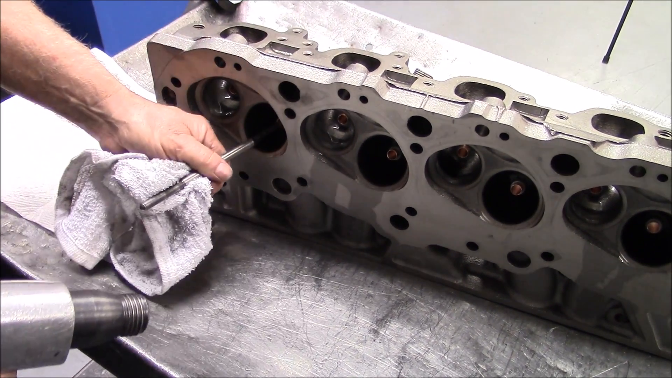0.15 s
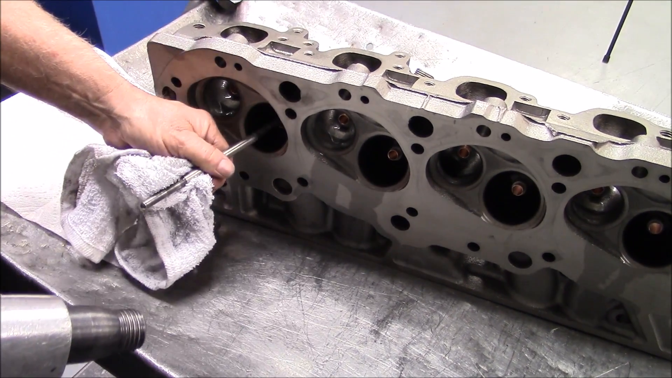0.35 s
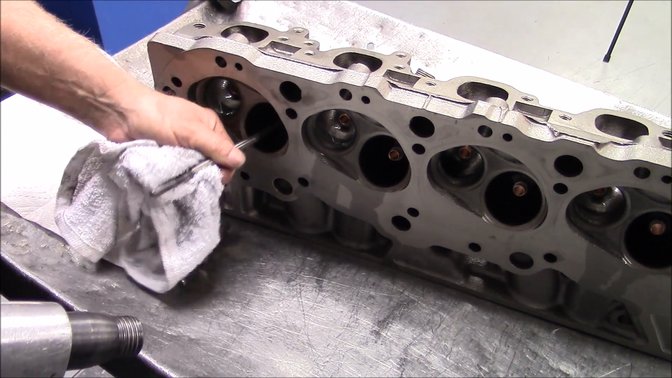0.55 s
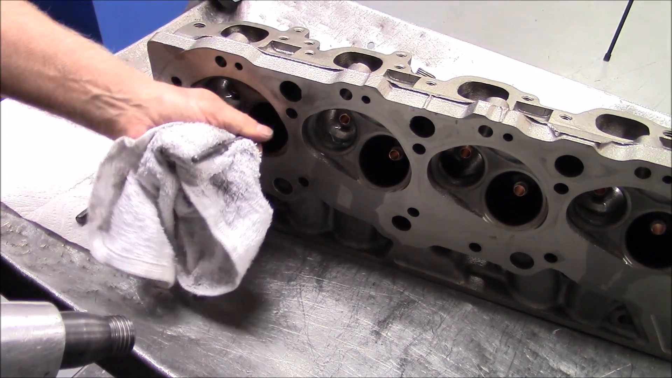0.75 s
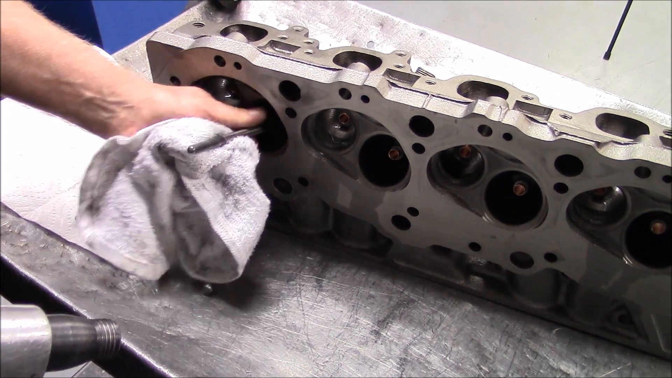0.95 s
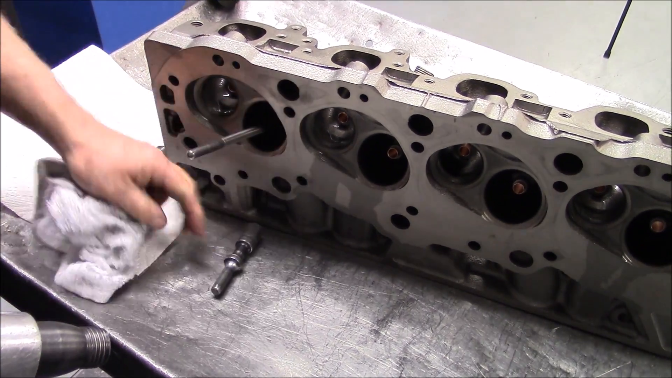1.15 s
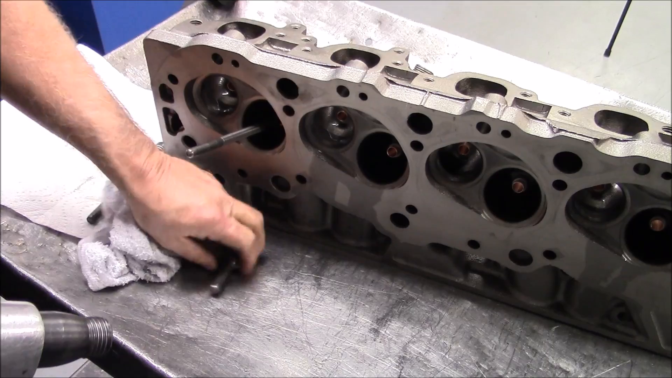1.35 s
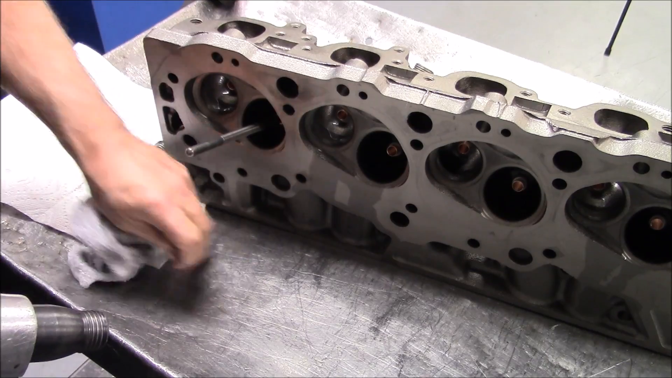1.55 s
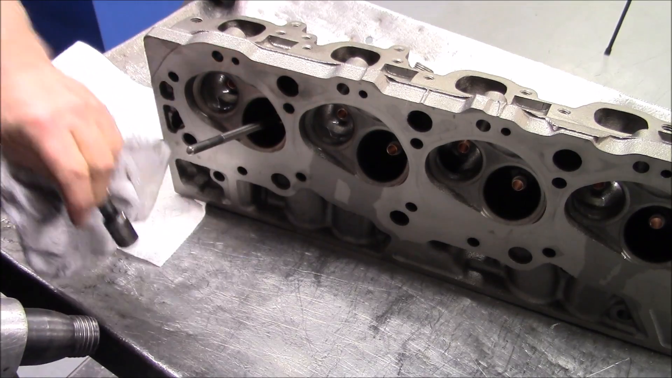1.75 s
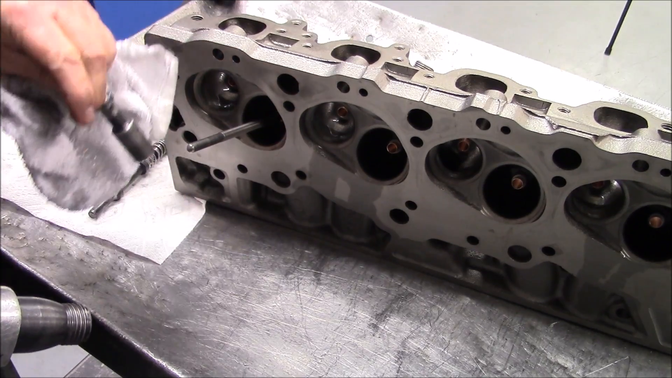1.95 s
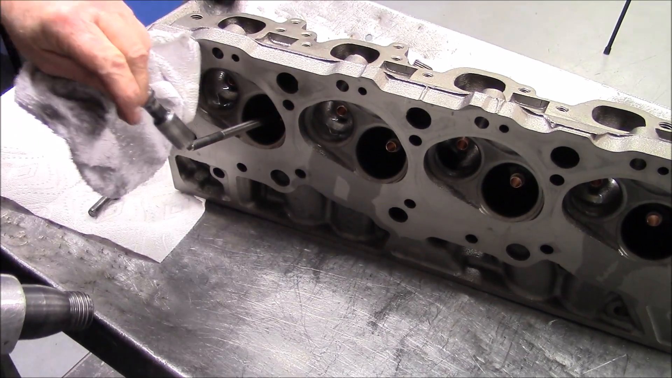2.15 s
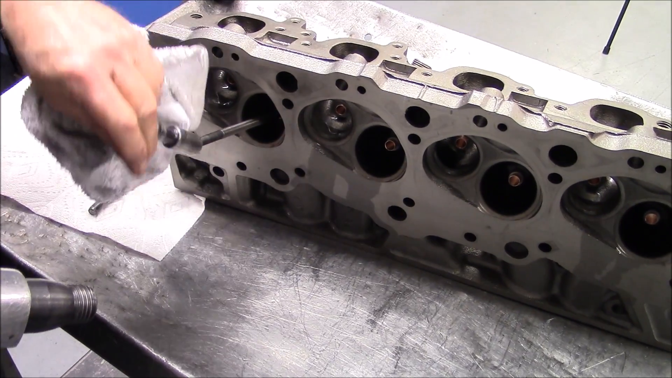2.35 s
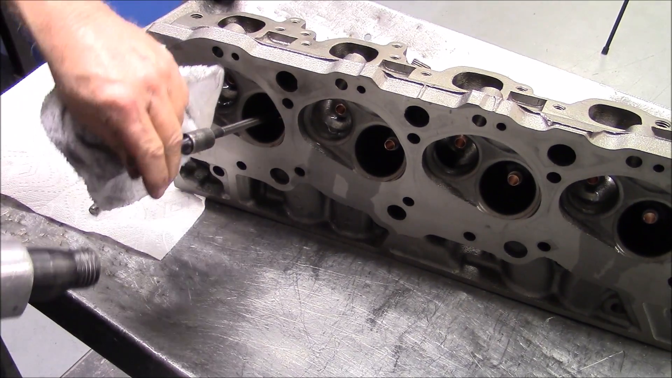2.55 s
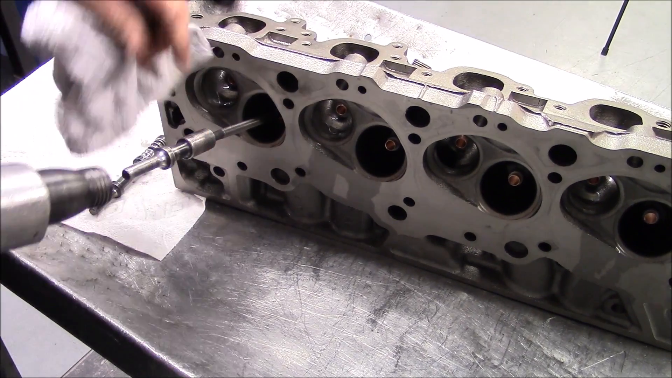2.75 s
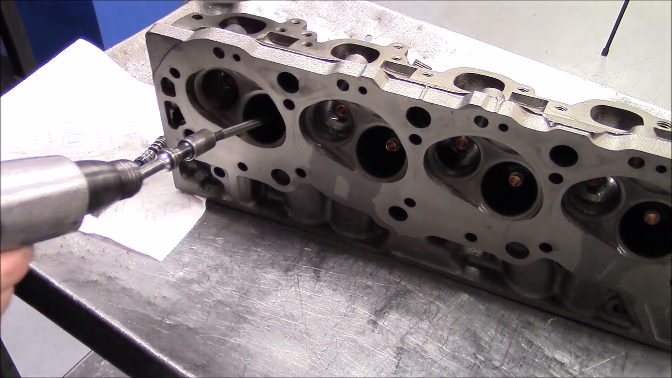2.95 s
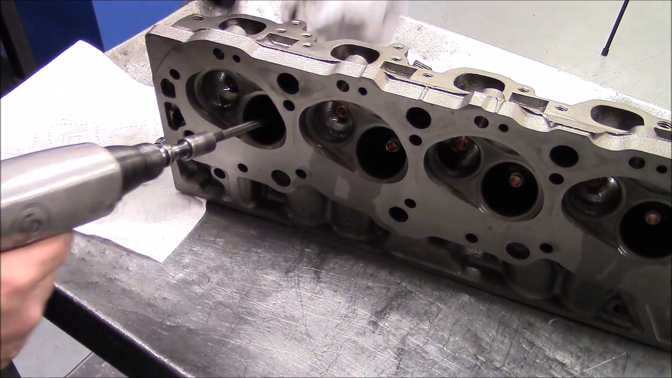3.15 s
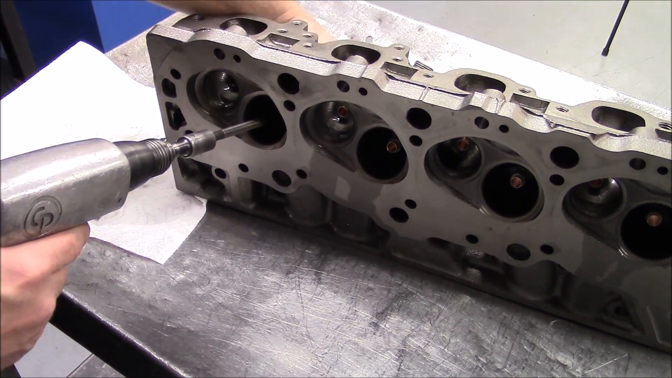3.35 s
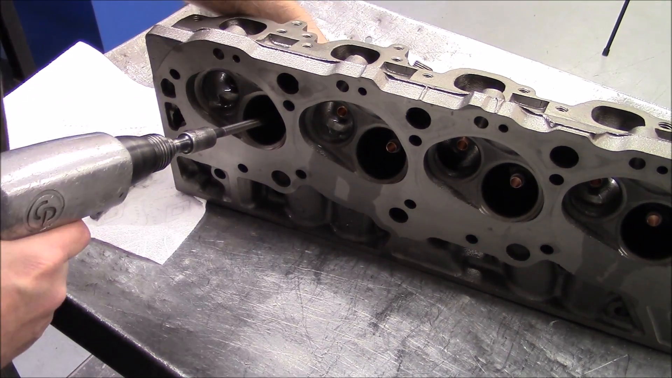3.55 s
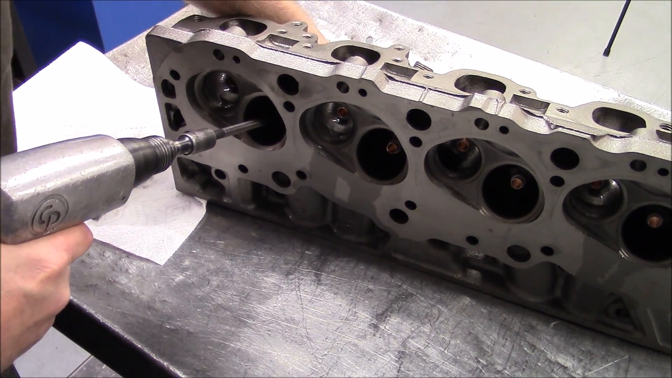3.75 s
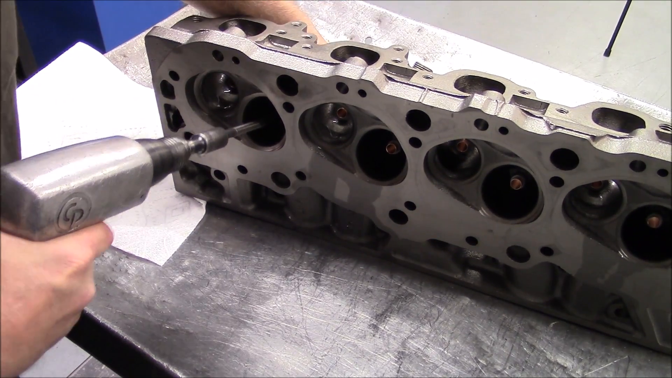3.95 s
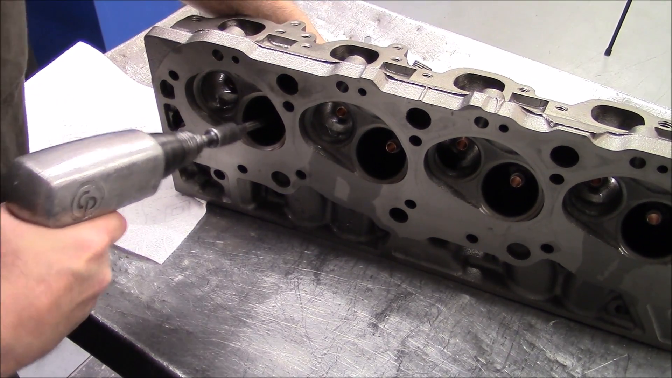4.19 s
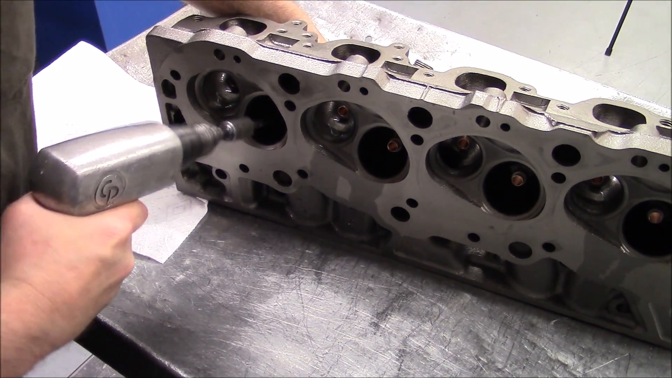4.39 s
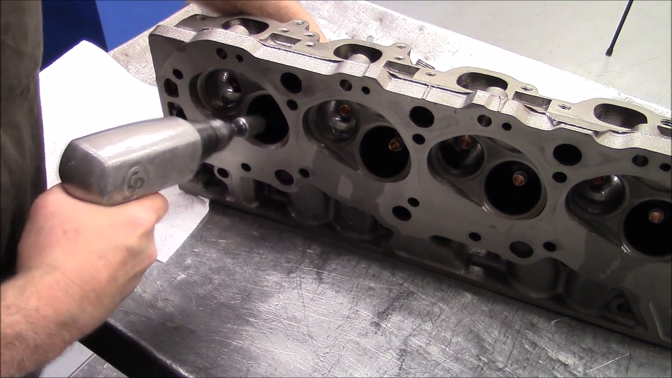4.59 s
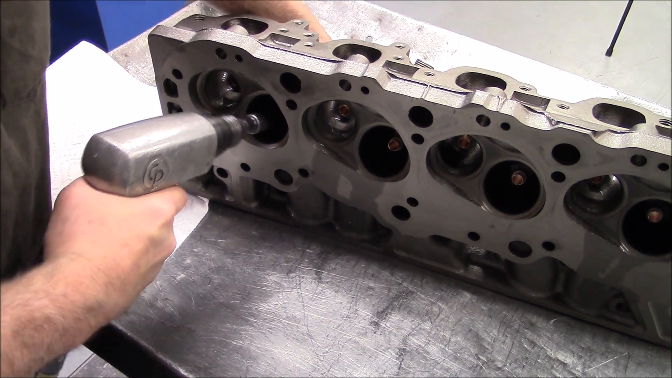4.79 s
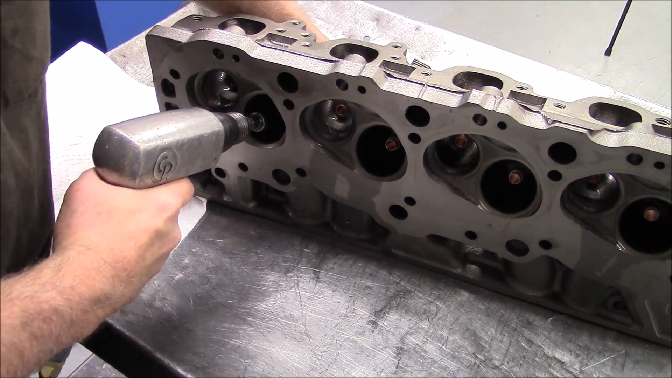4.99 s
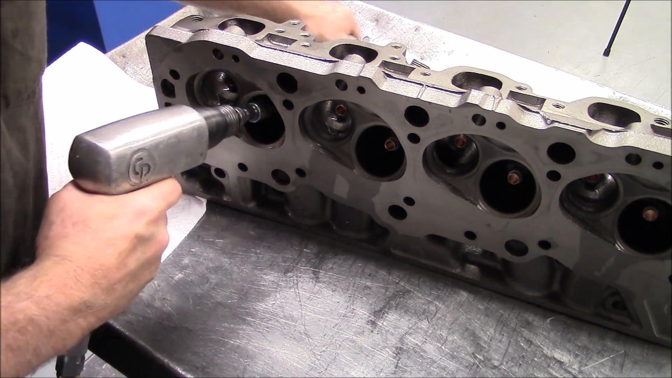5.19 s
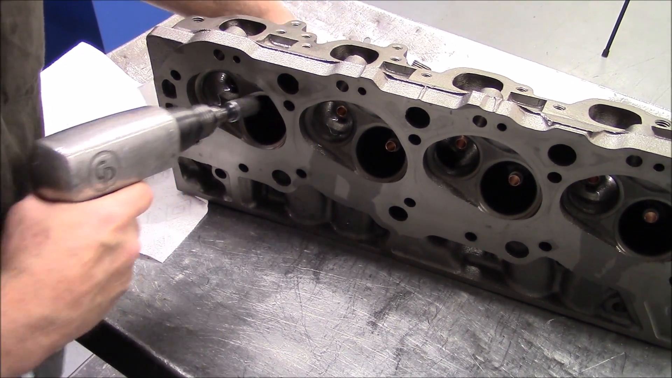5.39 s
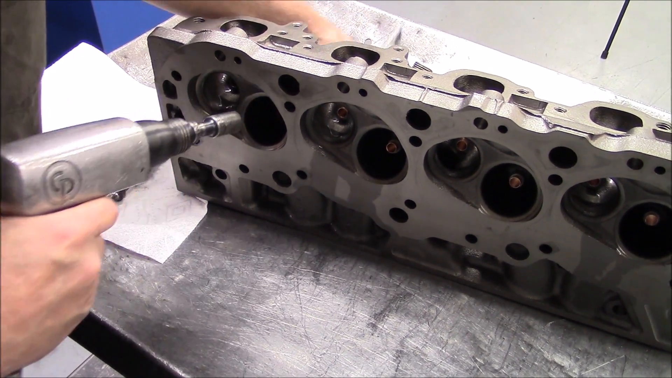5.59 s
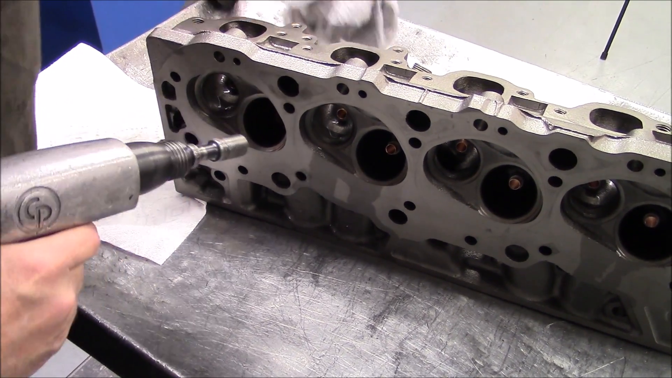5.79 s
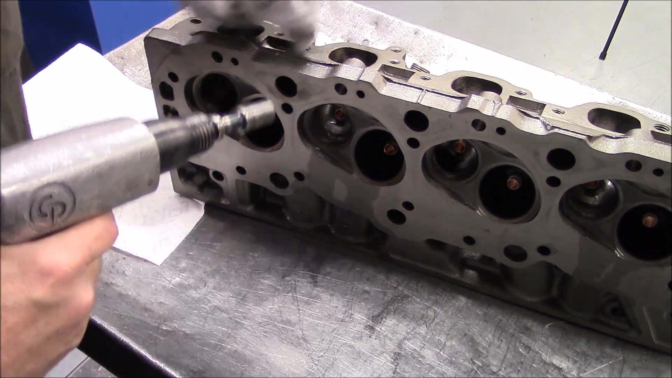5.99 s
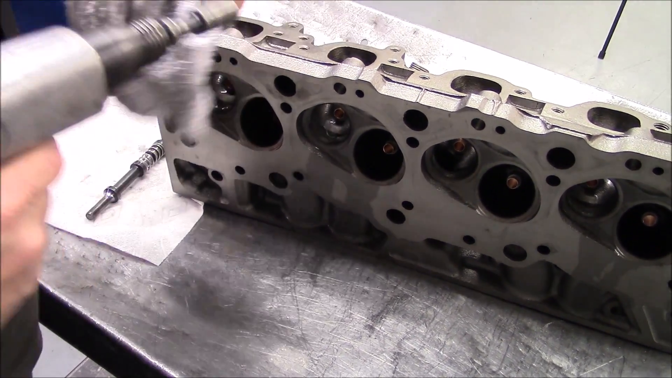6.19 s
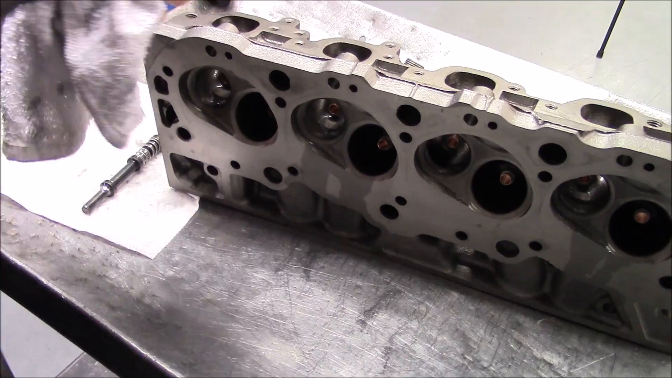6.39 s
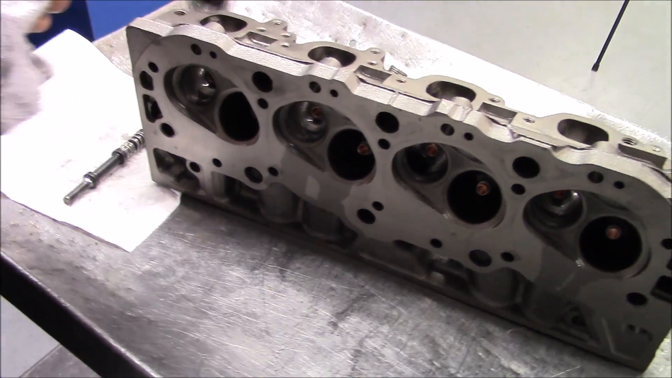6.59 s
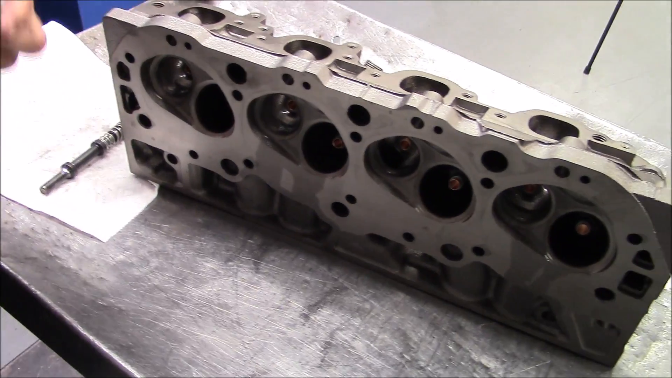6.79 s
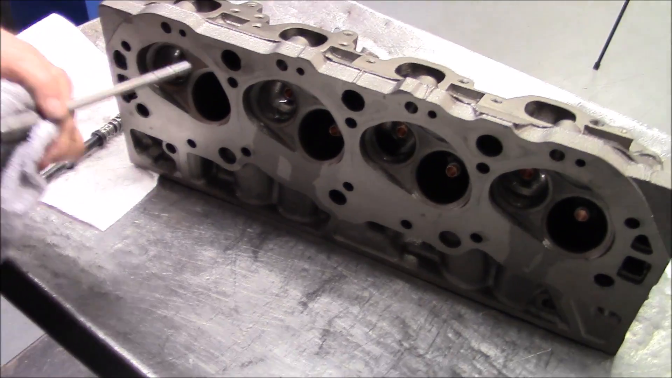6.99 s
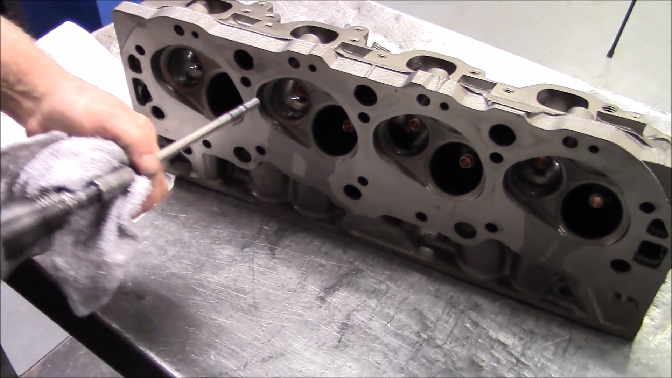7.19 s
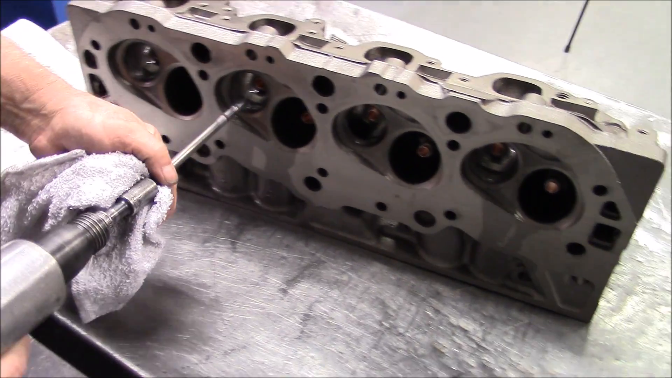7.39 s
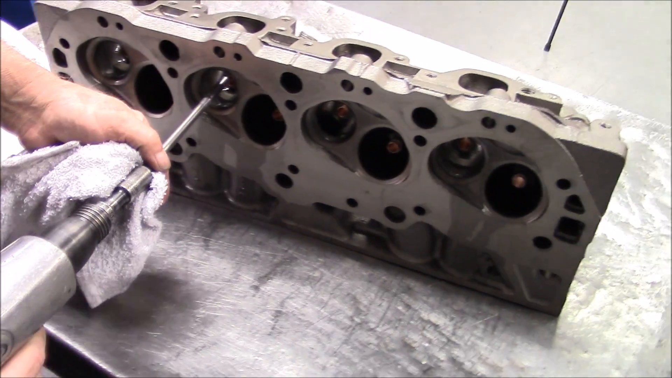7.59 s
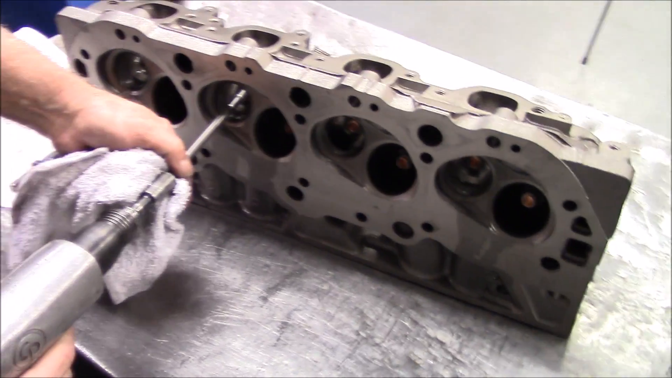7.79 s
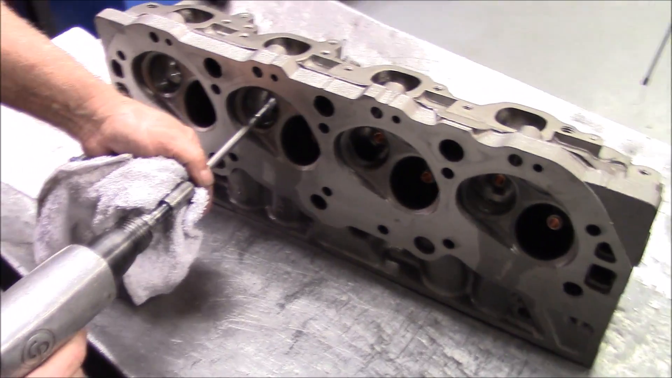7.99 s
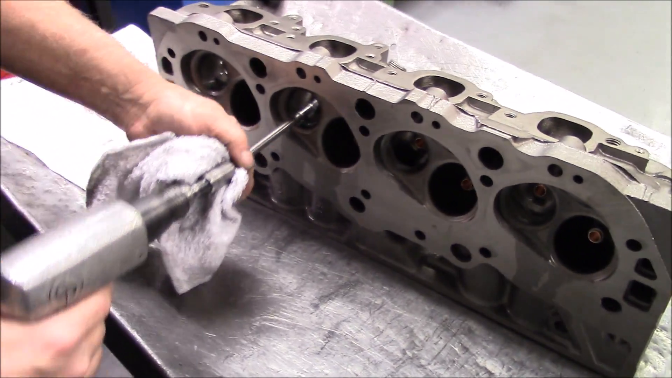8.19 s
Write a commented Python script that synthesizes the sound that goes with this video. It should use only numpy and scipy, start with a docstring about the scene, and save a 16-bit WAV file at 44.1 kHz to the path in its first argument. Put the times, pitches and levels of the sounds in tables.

```python
"""Workshop, sheet-steel bench. An air hammer drives a steel rod through a cast cylinder head:
each blow thumps the bench, rattles rod and bit, rings the casting and puffs exhaust air.
Before and after, rods and sockets clink and jingle on the casting, parts knock and scrape
on the bench. A struck steel tube hums on; a rag swishes near the end. Low rumble and faint hiss below."""
import sys
import numpy as np
from scipy import signal
from scipy.fft import rfft, irfft
from scipy.io import wavfile

SR = 44100
rng = np.random.default_rng(int(sys.argv[2]) if len(sys.argv) > 2 else 0)


def file_out(sig):
    """Save sig as 16-bit WAV at sys.argv[1]."""
    # one column per channel
    cols = np.atleast_2d(sig).T
    # limit, then scale
    lim = np.clip(cols, -1, 1)
    pcm = np.round(lim * 32767).astype(np.int16)
    wavfile.write(sys.argv[1], SR, pcm)


N = 363384

# background levels: time_s, rumble_db, hiss_db
SHOP_LEVELS = [(0, -70, -72), (.4, -68, -68), (.9, -59, -62), (1.4, -57.5, -64), (2.2, -59.5, -66),
               (2.6, -56.5, -62), (3.35, -49.5, -57), (3.72, -54, -58.5), (5.15, -78, -73), (5.6, -57, -86),
               (6.15, -66, -69), (6.35, -56.5, -73), (6.75, -74, -71.5), (8.24, -64, -64)]
# background spectra: freq_hz, density_db
RUMBLE_SPECTRUM = [(15, -55), (25, -22.5), (54, -25.5), (213, -7), (266, 3), (381, -7), (659, -12.5),
                   (824, -17), (1140, -27.5), (1500, -25.5), (1950, -48.5), (3300, -120)]
HISS_SPECTRUM = [(350, -39), (600, -9), (880, -13), (1220, -7.5), (1540, -7), (2260, -5), (4080, -8),
                 (5740, -8.5), (15800, -18)]
# steel touching the casting: start_s, level_db, brightness_db, ping_hz, tick_db
CLINKS = [(0.1316, -28, -8.5, 3610, -57), (0.5394, -31, -5, 2530, -40), (0.698, -26.5, -1.5, 7820, -41),
          (1.3933, -27, 0.5, 4590, -34.5), (1.6029, -28, -21.5, 2770, -60),
          (2.2335, -13.5, 2.5, 9350, -26.5), (2.2642, -19, 2.5, 6370, -27), (2.476, -17, -2.5, 8350, -28),
          (2.5002, -16, 6, 5280, -24), (2.5172, -19, -2, 4820, -27), (2.592, -19, 1.5, 3790, -31),
          (2.6808, -10, 5.5, 7400, -33), (2.7296, -22, -2, 6420, -28), (2.8676, -37, -2.5, 3200, -43),
          (3.0121, -11.5, -2, 8500, -28.5), (3.0446, -7, 6.5, 7000, -17), (3.241, -12.5, -3, 6400, -12.5),
          (5.2249, -37, -10.5, 2335, -38.5), (5.3474, -27, 2, 11600, -49), (5.3967, -11, -6, 2837, -19.5),
          (6.4686, -43, -5, 3550, -58), (6.5495, -41, 3, 5120, -57), (6.5825, -27.5, 4.5, 4800, -18),
          (6.6918, -50, 6, 7320, -58), (6.88, -51, -1, 2803, -63.5), (7.8257, -41, -11, 1965, -45),
          (7.884, -44, -4, 1010, -62), (7.9942, -30, -5, 6200, -43.5)]
# dull knocks on the bench: start_s, push_db, note_hz, note_db
KNOCKS = [(0.768, -37.5, 790, -57), (0.968, -31, 770, -67), (1.505, -15.5, 1070, -35.5),
          (3.245, -31.5, 248.2, -41), (6.293, -29, 823, -45), (7.334, -53, 970, -65.5),
          (7.557, -51.5, 1310, -64.5), (7.827, -41.5, 950, -48)]
# parts dragged on the bench: start_s, full_s, release_s, end_s, low_db, mid_db, high_db
DRAGS = [(1.385, 1.44, 1.62, 1.59, -23, -24, -35.5), (5.392, 5.398, 5.43, 5.52, -19, -18, -28),
         (5.44, 5.54, 5.65, 5.704, -26.5, -17.5, -27.5), (6.2, 6.25, 6.27, 6.4, -42.5, -48, -57.5)]
# blows on a hollow steel tube: start_s, level_db
TUBE_HITS = [(1.508, -1.5), (1.606, -2.5)]
# sockets jingling in the hand: start_s, full_s, release_s, end_s, mid_db, high_db
JINGLES = [(2.225, 2.236, 2.25, 2.38, -43, -35), (2.41, 2.5, 2.51, 2.58, -27, -33),
           (2.585, 2.66, 2.72, 2.85, -42, -54), (3.011, 3.02, 3.07, 3.18, -37, -33),
           (5.23, 5.25, 5.33, 5.34, -64, -60), (5.335, 5.352, 5.395, 5.41, -48, -43)]
# piston blows as the trigger opens and closes: start_s, thump_db, steel_db
SINGLE_BLOWS = [(3.756, -12, -1.5), (3.779, 14.5, -6.5), (3.801, -12.5, -13.5), (3.820, 14.5, -2.5),
                (3.853, 10, -1.5), (3.885, 12, -3), (3.921, 11, -4.5), (3.965, 9, -4.5), (4.005, 9.5, -6),
                (4.852, -19.5, -22)]
# steady run as the rod sinks in: time_s, thump_db, steel_db
RUN_LEVELS = [(4.03, 13.5, -2.5), (4.17, 6, -8.5), (4.27, 10.5, -5.5), (4.37, 6, -12.5), (4.47, -4, -16),
              (4.6, -7, -12), (4.82, -10.5, -15)]
# loose bit chattering between blows: time_s, level_db
CHATTER_LEVELS = [(3.73, -59), (3.75, -34), (3.9, -28.5), (4.0, -28), (4.04, -21.5), (4.33, -26.5),
                  (4.45, -27.5), (4.83, -32.5), (4.88, -60)]
# swelling notes of the rod: low_hz, high_hz, start_s, full_s, release_s, end_s, level_db
ROD_NOTES = [(4600, 5270, 3.95, 4.04, 4.36, 4.5, 12), (5600, 7200, 4.15, 4.35, 4.4, 4.93, 11.5),
             (9000, 11000, 3.9, 4.04, 4.35, 4.65, 4), (12700, 13500, 4.05, 4.17, 4.86, 8.8, 3.5),
             (1830, 2100, 2.4, 4.1, 5.9, 6.3, 12.5), (2469, 2580, 4.2, 3.95, 4.5, 4.9, 6)]
# rag and sleeve: start_s, full_s, release_s, end_s, level_db
SWISHES = [(6.12, 6.24, 6.25, 6.27, -60), (6.9, 7.01, 7.09, 7.19, -53), (7.33, 7.42, 7.55, 7.6, -63),
           (7.6, 7.635, 7.645, 7.68, -60), (7.67, 7.71, 7.75, 7.82, -63), (7.94, 7.975, 7.98, 8.0, -50),
           (8.05, 8.19, 8.21, 8.3, -46)]
# clear modes: pitch_hz, level_db, t60_s
CASTING_MODES = [(1007, -13, 1.2), (1355, -13, .55), (1960, -9, .5), (2336, -9, .5), (2516, -1, .4),
                 (2990, -6, .25), (3170, -5, .3), (3580, -3, .3), (3895, -4, .25), (4060, -7, .3),
                 (4440, -5, .3), (4800, -4, .3), (4920, -7, .22), (5170, -3, .2), (5640, -5, .2),
                 (6250, -3, .14), (6650, -4, .15), (7030, -2, .15), (7470, -4, .15), (8050, -4, .12),
                 (9270, -3, .13), (11300, -6, .1)]
BENCH_MODES = [(295, 4.5, 0.99), (311.4, -8, 3.4), (522.6, 12.5, 0.55), (581.2, -3, 1.45), (884, 2.5, 1.33),
               (1182, -60, 2.4), (1207, -41, 0.42), (1354, -12.5, 2.1), (1692, 9, 0.57), (2070, -6, 0.77),
               (2460, -3, 0.82), (2630, 4, 0.58)]
TUBE_MODES = [(359.3, 2, 3.2), (824.6, 2, 1.9), (1447, -3, 1.09)]
THUMP_MODES = [(186, -9.5, 0.29), (257, -0.5, 0.12), (319.4, -0.5, 0.15), (420, 4, 0.062),
               (541, -4.5, 0.078), (670, 6.5, 0.012), (811, 5.5, 0.022), (943, -8, 0.0073),
               (1959, 0.5, 0.035)]
BIT_MODES = [(3310, -13, 0.011), (5550, -10.5, 0.0094), (5440, -4, 0.014), (6030, -8.5, 0.017),
             (6970, -10, 0.031), (7570, 1, 0.017), (9450, -2, 0.017), (10110, 1, 0.0099),
             (11200, -10.5, 0.051), (12770, -1, 0.013), (14700, -22, .02)]
# dense modes, heard as dying noise: freq_hz, density_db, t60_s
CASTING_DENSE = [(690, 15, 0.3), (1440, -15, 0.39), (3000, 13, 0.23), (5170, 4, 0.1), (7860, 22, 0.14),
                 (11000, -5.5, 0.045), (13000, -13, .06), (16000, 3.5, .04)]
BENCH_DENSE = [(150, -22, 0.66), (265, -2.5, 0.48), (710, 12, 0.74), (1380, 7.5, 0.6), (3000, 1.5, 0.49),
               (5630, 2, 0.065), (9600, -11, 0.074), (15900, -36, .05)]
ROOM_REVERB = [(200, -2.5, 0.21), (504, 6, 0.8), (1965, -3, 0.54), (6000, 2, 0.32), (12100, -1, .15),
               (16390, -10.5, 0.13)]

RUN_START_S, RUN_BLOWS, UNEVEN_DB = 4.0305, 34, 1.5
STROKE_S, SLOWING_S_PER_BLOW = .02332, .000024
SWELL_DEPTH_DB = 26
CUTOFF_HZ = 16150


def amp(db):
    """dB to gain."""
    return 10 ** (np.asarray(db, float) / 20)


def unit_rms(x):
    """Scale to rms 1."""
    return x / np.sqrt(np.mean(x ** 2) + 1e-20)


def gains(span):
    """Rows of time and levels to one gain curve per level column; silent outside."""
    t = np.arange(N) / SR
    time_s, *columns = np.transpose(span)
    return np.array([amp(np.interp(t, time_s, db, -200, -200)) for db in columns])


def swells(rows):
    """Rise, hold and fade over each row's four times, sorted; one gain curve per level column."""
    out = 0
    for row in rows:
        levels_db = np.array(row[4:]) - SWELL_DEPTH_DB * np.array([[1], [0], [0], [1]])
        out = out + gains(np.column_stack([sorted(row[:4]), levels_db]))
    return out


def band(x, low_hz, high_hz):
    """Butterworth band-pass."""
    sos = signal.butter(2, [low_hz, min(high_hz, .45 * SR)], "band", fs=SR, output="sos")
    return signal.sosfilt(sos, x)


def coloured(spectrum):
    """Steady noise of a given spectrum, rms 1."""
    hz, db = np.transpose(spectrum)
    log_hz = np.log(np.fft.rfftfreq(N, 1 / SR) + 1)
    shape = amp(np.interp(log_hz, np.log(hz), db, -90, -90))
    return unit_rms(irfft(rfft(rng.standard_normal(N)) * shape, N))


def flicker(rate_hz, depth_db):
    """Randomly wandering gain."""
    knots = rng.standard_normal(N // 100)
    return amp(depth_db * np.interp(np.arange(N) / SR * rate_hz, np.arange(len(knots)), knots))


def grains(per_s, spread_db):
    """Random clicks of uneven size, rms 1."""
    size = amp(spread_db * np.minimum(rng.exponential(1, N), 5)) * rng.choice([-1, 1], N)
    return unit_rms(size * (rng.random(N) < per_s / SR))


def response(modes=None, dense=None, dense_db=0):
    """Unit-energy impulse response: clear modes plus half-octave bands of dying noise."""
    t, out = np.arange(2 * SR) / SR, 0
    if modes:
        out = unit_rms(sum(amp(db - 60 * t / t60_s) * np.sin(2 * np.pi * hz * t)
                           for hz, db, t60_s in modes))
    if dense:
        hz, db, t60_s = np.transpose(dense)
        noise = 0
        for low_hz in 120 * 2 ** np.arange(0, 7.5, .5):
            log_centre = np.log(low_hz * 2 ** .25)
            decay_s = np.interp(log_centre, np.log(hz), t60_s)
            level_db = np.interp(log_centre, np.log(hz), db) - 60 * t / decay_s
            carrier = band(rng.standard_normal(len(t)), low_hz, low_hz * np.sqrt(2))
            noise = noise + amp(level_db) / np.sqrt(decay_s) * carrier
        out = out + amp(dense_db) * unit_rms(noise)
    return unit_rms(out) / np.sqrt(len(t))


def ring(force, body):
    """Convolve a force with a body's impulse response."""
    return signal.fftconvolve(force, body)[:N]


def clicks(start_s, db):
    """One impulse per start."""
    out = np.zeros(N)
    out[(np.asarray(start_s) * SR).astype(int)] = amp(db)
    return out


def bursts(start_s, db, decay_s, rise_s=.000078):
    """Envelope: exponential rise and decay at each start."""
    t = np.arange(round(8 * decay_s * SR)) / SR
    shape = (1 - np.exp(-t / rise_s)) * np.exp(-t / decay_s)
    return ring(clicks(start_s, db), shape / shape.max())


def notes(start_s, level_db, pitch_hz, t60_cycles):
    """One decaying sine per start."""
    out, t = np.zeros(N), np.arange(SR) / SR
    for s, db, hz in zip(start_s, level_db, pitch_hz):
        i = round(s * SR)
        note = amp(db - 60 * t * hz / t60_cycles) * np.sin(2 * np.pi * hz * t)
        out[i:i + len(t)] += note[:N - i]
    return out


def contact_force(low, mid, high, source):
    """Source weighted in three registers of the casting."""
    return (low * band(source, 1000, 3000) + mid * band(source, 3300, 4700)
            + high * band(source, 6500, 17000))


def workshop():
    """Low rumble and faint hiss, both wavering."""
    rumble_gain, hiss_gain = gains(SHOP_LEVELS)
    hiss = hiss_gain * coloured(HISS_SPECTRUM) * flicker(25, depth_db=1)
    rumble = rumble_gain * coloured(RUMBLE_SPECTRUM) * flicker(5, depth_db=-1)
    return rumble + hiss


def clinks(casting):
    """Short hard contacts: a tick, the casting rings, the small part pings at its own pitch."""
    start_s, db, bright_db, ping_hz, tick_db = np.transpose(CLINKS)
    registers_db = db - bright_db, db, db - 4.5 + bright_db
    envelopes = [bursts(start_s, level_db, decay_s=.0025, rise_s=.00091) for level_db in registers_db]
    scuff = contact_force(*envelopes, rng.standard_normal(N))
    tick = bursts(start_s, tick_db, decay_s=.0022, rise_s=.0025) * rng.standard_normal(N)
    ping = notes(start_s, db - 15, ping_hz, t60_cycles=530)
    return band(tick, 3200, 8500) + amp(-6.5) * ring(scuff, casting) + ping


def knocks(bench):
    """Soft contacts ring the bench, each with one strongest note."""
    start_s, push_db, note_hz, note_db = np.transpose(KNOCKS)
    push = band(bursts(start_s, push_db, decay_s=.0031) * rng.standard_normal(N), 280, 1650)
    return ring(push, bench) + notes(start_s, note_db, note_hz, t60_cycles=300)


def drags(bench):
    """Stick-slip grit under a sliding part excites the bench sheet."""
    low, mid, high = swells(DRAGS)
    grit = grains(7000, spread_db=2.5) * flicker(70, depth_db=2.5)
    force = low * band(grit, 272, 830) + mid * band(grit, 1300, 4060) + high * band(grit, 3200, 8400)
    return amp(-8) * force + amp(-7.5) * ring(force, bench)


def tube():
    """A struck hollow steel tube hums on."""
    return ring(clicks(*np.transpose(TUBE_HITS)), response(TUBE_MODES))


def jingles(casting):
    """Loose sockets make many small uneven contacts that ring the casting."""
    mid, high = swells(JINGLES)
    force = contact_force(amp(-10.5) * mid, mid, high, grains(2500, spread_db=3.5))
    return amp(-9) * force + amp(1) * ring(force, casting)


def piston_blows():
    """Single blows plus an uneven, slightly slowing run: start_s, thump_db, steel_db."""
    k = np.arange(RUN_BLOWS)
    start_s = RUN_START_S + STROKE_S * k + SLOWING_S_PER_BLOW * k ** 2 / 2
    time_s, *columns = np.transpose(RUN_LEVELS)
    run_db = np.transpose([np.interp(start_s, time_s, db) for db in columns])
    run_db += UNEVEN_DB * rng.standard_normal((RUN_BLOWS, 2))
    return np.vstack([SINGLE_BLOWS, np.column_stack([start_s, run_db])]).T


def air_hammer(casting):
    """Each blow thumps the bench; rod and bit rebound in a dense rattle with a puff of exhaust."""
    start_s, thump_db, steel_db = piston_blows()
    crunch = bursts(start_s, thump_db - 29.5, decay_s=.004, rise_s=.001) * rng.standard_normal(N)
    thump = ring(crunch - clicks(start_s, thump_db), response(THUMP_MODES))
    thump = band(band(thump, 140, 6000), 140, 6000)
    rebound = bursts(start_s + .00085, steel_db - 3, decay_s=.0049, rise_s=.0036)
    envelope = gains(CHATTER_LEVELS)[0] + rebound
    rattle = envelope * grains(12000, spread_db=2) + clicks(start_s + .002, steel_db + 10.5)
    rod = sum(swells([swell])[0] * flicker(35, depth_db=5) * band(rattle, low_hz, high_hz)
              for low_hz, high_hz, *swell in ROD_NOTES)
    bit = ring(band(rattle, 2300, 15000) + rod, response(BIT_MODES))
    head = ring(band(rattle, 1800, 12000), casting)
    exhaust = envelope * band(rng.standard_normal(N), 1700, 17000)
    return thump + amp(-7) * bit + amp(-9.5) * head + amp(-4.5) * exhaust


def rag():
    """Cloth swishes: swells of fine crackle."""
    return swells(SWISHES)[0] * band(grains(6500, spread_db=3.5), 1140, 6700)


def scene():
    """All sources centred; reverberation differs slightly left and right."""
    casting = response(CASTING_MODES, CASTING_DENSE, dense_db=8)
    bench = response(BENCH_MODES, BENCH_DENSE, dense_db=7.5)
    metal = air_hammer(casting) + clinks(casting) + jingles(casting)
    metal += band(drags(bench) + knocks(bench) + tube(), 200, 17000)
    reverb = amp(-13.5) * ring(metal, response(dense=ROOM_REVERB))
    centre = metal + reverb + rag() + workshop()
    echoes = rng.standard_normal(4000) * np.exp(-np.arange(4000) / 800)
    diffuse = band(ring(centre, echoes / np.linalg.norm(echoes)), 400, 17000)
    side = amp(-26) * band(band(diffuse, 400, 2000), 400, 2000)
    side += amp(-16) * band(band(diffuse, 2900, 17000), 2900, 17000)
    return np.array([centre + side, centre - side])


def record(dry):
    """Soft clip, microphone bass roll-off, steep top cut."""
    rounded = .85 * np.tanh(dry / .85)
    thin = signal.sosfilt(signal.butter(2, 110, "high", fs=SR, output="sos"), rounded)
    return signal.sosfilt(signal.cheby2(16, 80, CUTOFF_HZ, fs=SR, output="sos"), thin)


dry = scene()
out = record(dry)
file_out(out)
```